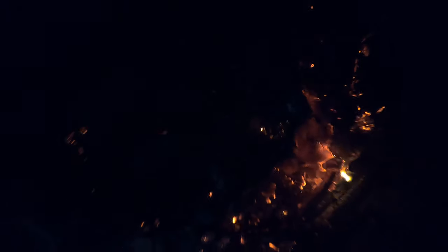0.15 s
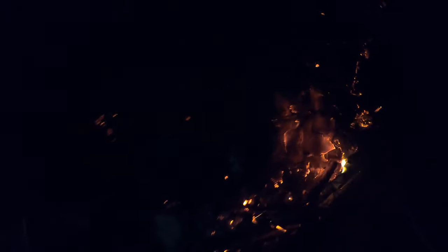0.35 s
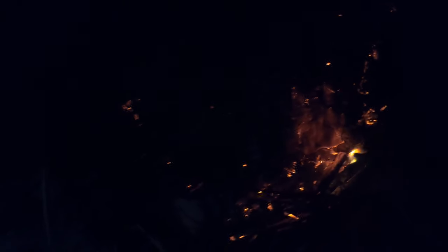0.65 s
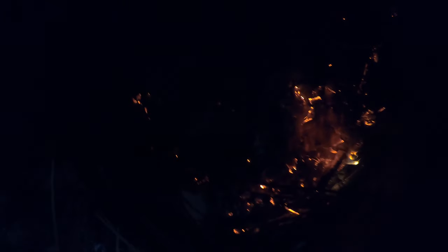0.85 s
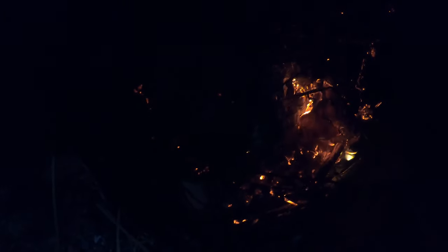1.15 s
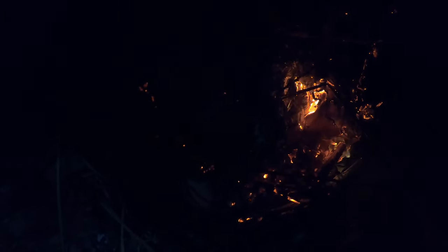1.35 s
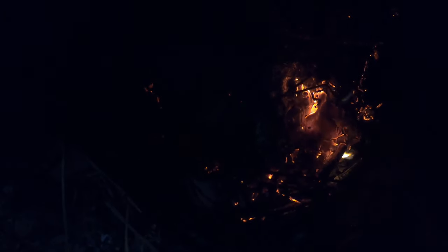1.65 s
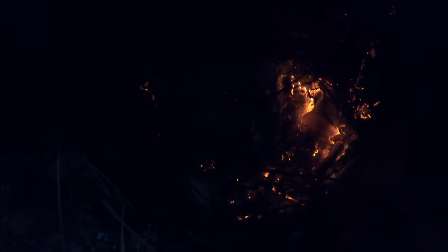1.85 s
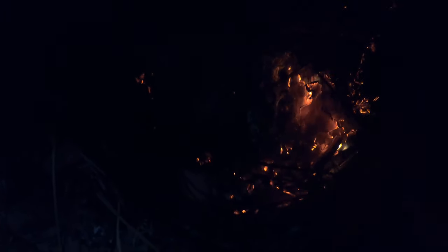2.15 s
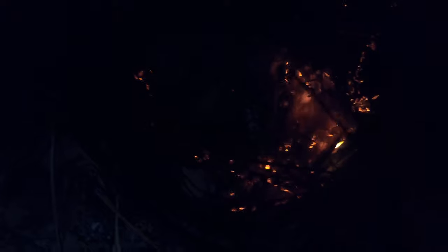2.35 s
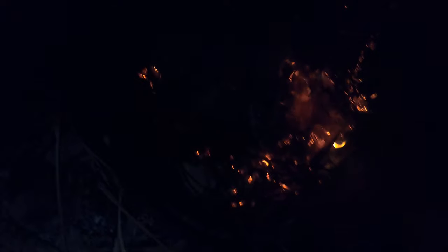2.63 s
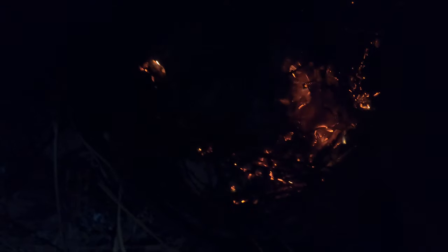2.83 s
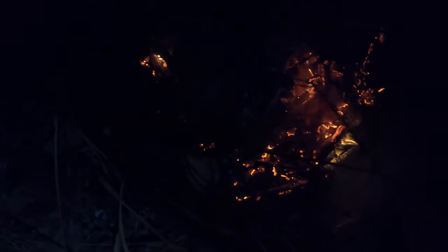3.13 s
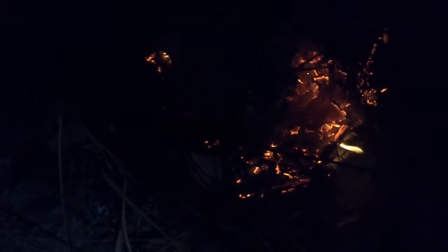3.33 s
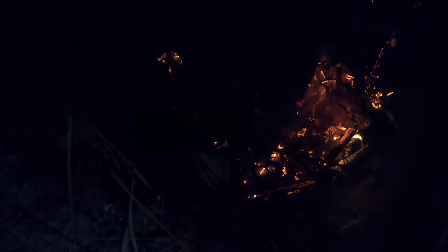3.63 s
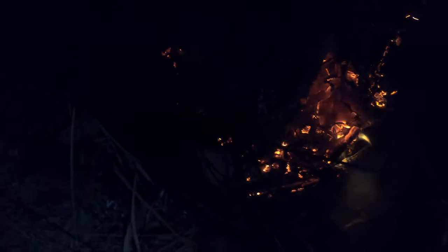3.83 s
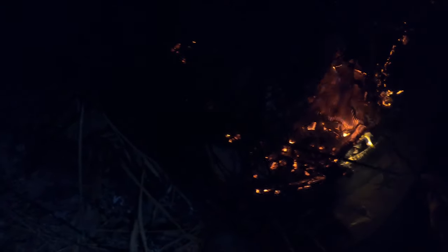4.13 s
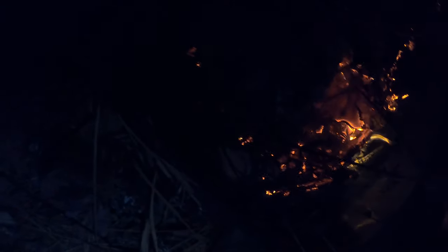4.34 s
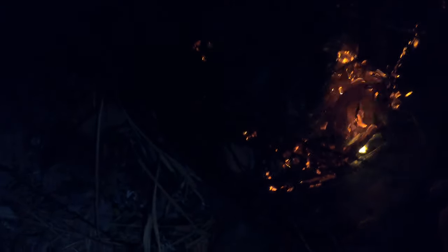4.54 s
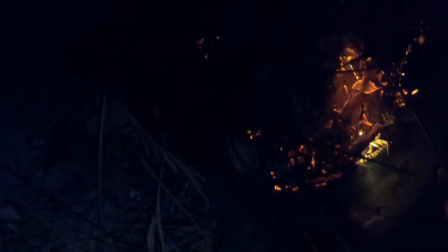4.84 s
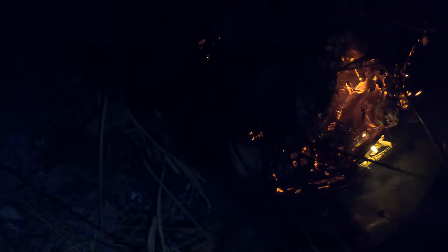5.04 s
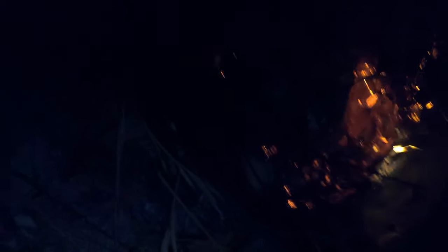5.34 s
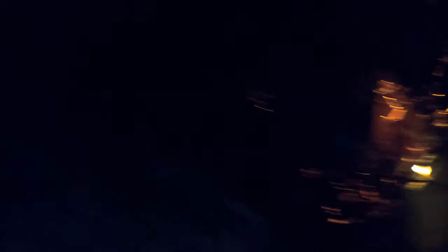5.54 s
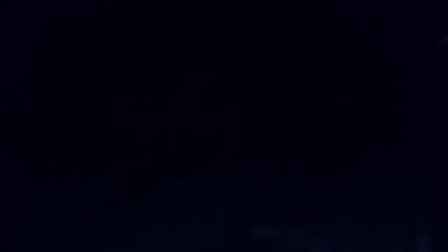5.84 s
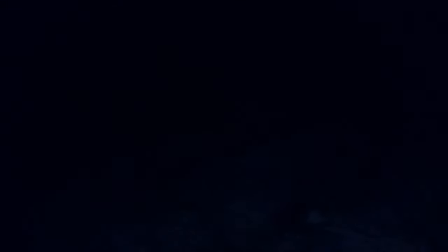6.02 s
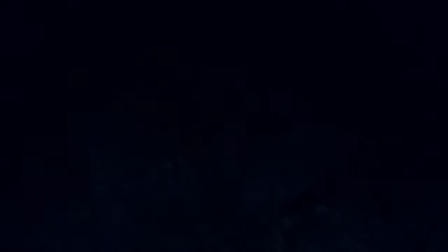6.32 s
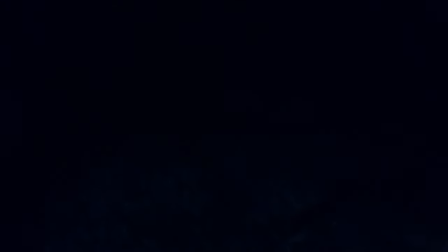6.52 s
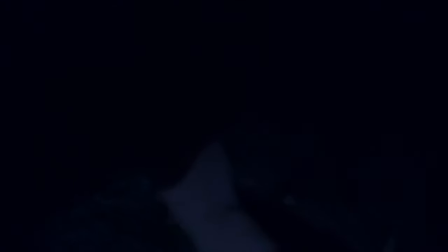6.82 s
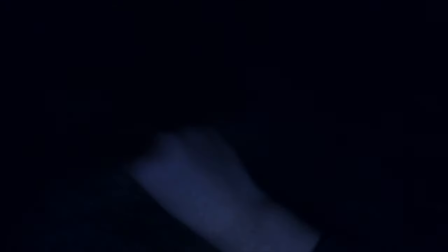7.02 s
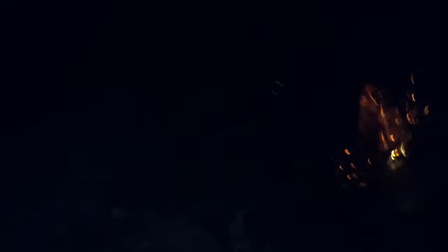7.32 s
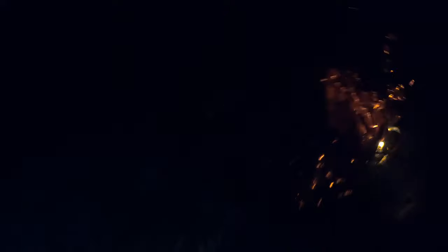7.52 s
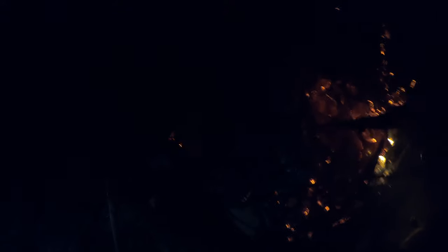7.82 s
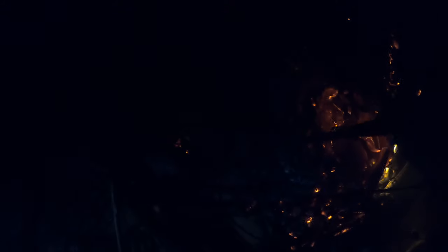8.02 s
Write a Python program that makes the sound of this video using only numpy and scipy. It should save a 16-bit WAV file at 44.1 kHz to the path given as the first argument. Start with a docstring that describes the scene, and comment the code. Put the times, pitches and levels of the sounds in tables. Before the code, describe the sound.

A night bonfire crackles and pops close by while wind thumps the microphone; thin metal rattles and rubs briefly, then the crackling returns.

```python
"""Bonfire at night

Close embers and stalks crackle as random damped clicks over noise; sap pockets pop, one crack peeps.
Thin metal rattles (noise through ringing modes) and rubs (slipping noise in narrow bands) to the right
while a hand-held camera turns away and back. Low noise buffets each of its two microphone ports on its
own, over a far hush of filtered noise.
"""
import sys
import numpy as np
from scipy import signal
from scipy.fft import rfft, irfft, next_fast_len
from scipy.io import wavfile
from scipy.ndimage import uniform_filter1d, map_coordinates

SR = 44100
rng = np.random.default_rng(int(sys.argv[2]) if len(sys.argv) > 2 else 0)


def pcm_store(signal):
    """Save signal as 16-bit PCM."""
    levels = np.round(np.clip(np.atleast_2d(signal), -1, 1) * 32767)
    wavfile.write(sys.argv[1], SR, levels.astype(np.int16).T)


N = 360288


# spectra of thin and of thick pieces: (frequency [Hz], relative level [dB])
FINE_SPECTRUM = [(710, -37.5), (1200, -12), (1780, -17), (3750, -6.5), (7830, -5.5), (9330, -1.5),
                 (10200, -6), (11100, -21), (13800, -18), (16500, -38)]
COARSE_SPECTRUM = [(180, -3), (600, 0), (3000, 4.5), (3900, -0.5), (6600, -120)]


def crackle():
    """Stalks burst as clicks over ember hiss; thick pieces sound lower; lone clicks recede as the level grows."""
    level_db, coarse_db = crackle_level(), curves(EMBER_LEVEL)[1]
    lone = amp(np.minimum(-0.4 * (level_db + 56.0), 1.5))

    fine = 0.36 * rng.standard_normal((2, N))
    fine = fine + 0.73 * ticks(900, 6500, spread_db=2.2, cycles=2.06)
    fine = fine + 0.96 * lone * ticks(170, 5800, spread_db=5.9, cycles=2.25)
    coarse = rng.standard_normal((2, N))
    coarse = coarse + 0.65 * lone * ticks(300, 1260, spread_db=2.4, cycles=3.7)

    flare_db = 2.47 * wobble(45)
    fine = unit(coloured(patchy(fine, depth_db=1.9), FINE_SPECTRUM))
    coarse = unit(coloured(patchy(coarse, depth_db=1.4), COARSE_SPECTRUM))
    return amp(level_db + flare_db) * (fine + amp(coarse_db) * coarse)


# steady crackle: (time [s], level of thin pieces [dB], thick relative to thin [dB])
EMBER_LEVEL = [(0, -49, -3.5), (0.3, -46, -7), (0.65, -49, -4), (1.15, -53.5, -5), (1.5, -46.5, -4),
               (1.83, -51.5, -4), (2.4, -48.5, 2), (2.9, -41.5, -1.5), (3.17, -50, -2), (3.9, -46.5, -8.5),
               (4.6, -45.5, 1), (4.78, -50.5, -2), (4.9, -45, -9.5), (5.6, -52, -2.5), (5.8, -64, 4.5),
               (7.14, -65, 0), (7.22, -53, -9), (8.17, -49, -2)]
# a bunch of stalks catches: (start [s], length [s], level [dB])
STALK_SURGES = [(0.397, 0.067, -42), (1.24, 0.034, -46), (1.549, 0.096, -43.5), (1.88, 0.1, -46.5),
                (2.062, 0.072, -43), (2.297, 0.013, -32.5), (2.58, 0.13, -33.5), (2.87, 0.15, -43),
                (3.239, 0.2, -41.5), (3.53, 0.029, -36), (4.502, 0.029, -43), (5.13, 0.092, -44),
                (7.797, 0.12, -38), (7.976, 0.125, -40), (8.132, 0.014, -29.5)]
SURGE_RISE_S, SURGE_FADE_S = 0.013, 0.0091  # time constants


def crackle_level():
    """Level in dB of the steady crackle plus the power of each surge."""
    power = amp(2 * curves(EMBER_LEVEL)[0])
    for start_s, length_s, db in STALK_SURGES:
        power = power + amp(2 * db) * swell(start_s, length_s, SURGE_RISE_S, SURGE_FADE_S)
    return 10 * np.log10(power)


def ticks(rate_hz, centre_hz, spread_db, cycles):
    """Clumped damped clicks of random pitch, a few much larger; row 2 sets each one aside."""
    at = np.flatnonzero(rng.random(N) < rate_hz / SR * amp(3.5 * wobble(30)))
    draw = rng.standard_normal((len(at), 2))
    hz = np.clip(centre_hz * np.exp(0.63 * draw[:, :1]), 300, 14000)
    size = amp(-spread_db * np.log(rng.random((len(at), 1)) + 0.034))

    lag = np.arange(160)
    u = hz * lag / SR  # cycles elapsed
    click = size * amp(-60 * u / cycles) * np.sin(2 * np.pi * u)
    aside = draw[:, 1:] * click * np.cos(np.pi * u)
    index = (at[:, None] + lag).ravel()
    rows = [np.bincount(index, r.ravel(), N + len(lag))[:N] for r in (click, aside)]
    return unit(np.array(rows))


def patchy(x, depth_db):
    """Random patches of gain over time and pitch."""
    z = signal.stft(x, nperseg=256)[2]
    field = rng.standard_normal(z.shape[1:])
    field = uniform_filter1d(uniform_filter1d(field, size=7, axis=0), size=6, axis=1)
    return signal.istft(z * amp(depth_db * unit(field)), nperseg=256)[1][:, :N]


# bursting sap pockets: (time [s], peak before colouring [dB], main ring [Hz])
SAP_POPS = [(0.3478, -15.5, 3500), (0.418, -17.5, 9000), (0.626, -30, 3000), (0.81, -21.5, 3530),
            (0.8654, -25, 3200), (0.9803, -27.5, 2900), (1.2722, -24, 3750), (1.4356, -12, 3900),
            (1.6338, -26.5, 7400), (1.7474, -17, 3760), (1.765, -29, 915), (1.912, -31, 1430),
            (1.9666, -13.5, 3680), (2.074, -21, 1660), (2.0777, -21.5, 766), (2.1022, -25, 3660),
            (2.1819, -18, 5560), (2.2191, -24, 3350), (2.4031, -23.5, 5840), (3.422, -19.5, 5070),
            (3.8132, -24, 7000), (4.0076, -26.5, 5070), (4.3898, -26.5, 9000), (4.9846, -28, 2050),
            (5.3825, -27.5, 5860), (6.75, -25.5, 10400), (7.6739, -28.5, 2780), (7.7865, -25, 3200),
            (7.8753, -20, 2750), (8.012, -31, 1150), (8.0215, -18, 3120), (8.0572, -20.5, 2730),
            (8.129, -21.5, 2220), (8.1429, -15, 3300), (8.1571, -13.5, 2890)]


def snaps():
    """Each pop: noise crack behind a sharp push of air, one short ring, faint scatter from the ground."""
    out, t = np.zeros((2, N + SR)), np.arange(SR // 20) / SR
    for s, db, hz in SAP_POPS:
        decay = amp(-60 * t / 0.003) + 0.47 * amp(-60 * t / 0.017)  # crack, ground scatter
        crack = rng.standard_normal((2, len(t))) * decay
        ring_t60_s = min(16 / hz, 0.016)
        ring = 2.16 * np.sin(2 * np.pi * hz * t + [[0], [np.pi / 2]]) * amp(-60 * t / ring_t60_s)
        push = -1.5 * np.exp(-((t - 0.0002) / 0.00007) ** 2)
        pop = (crack + ring) * (1 - np.exp(-t / 0.0004)) + push * [[1], [0.3]]
        at = round(s * SR)
        out[:, at:at + len(t)] += amp(db) * pop / np.abs(pop[0]).max()
    return coloured(out[:, :N], [(300, 1.5), (1500, 3), (3500, 5.0), (7000, 11),
                                 (9700, 12.0), (11000, -3.5), (15000, -16.0)])


# sap steam from a crack: (middle [s], half length [s], level [dB], pitch [Hz])
STEAM_PEEP = (1.645, .022, -47, 3156)


def whistle():
    """One brief peep of sap steam: a sine with slightly unsteady phase."""
    s, half_s, db, hz = STEAM_PEEP
    t = np.arange(N) / SR
    tone = np.sin(2 * np.pi * hz * t + 0.38 * wobble(79.4))
    return amp(db) * np.exp(-((t - s) / half_s) ** 4) * np.array([tone, tone / 2])


# shakes of thin metal: (time [s], relative level [dB], scrape t60 [s])
METAL_SHAKES = [(5.835, -28, 0.087), (5.952, -21.5, 0.038), (6.013, -24.5, 0.12), (6.0605, -27, 0.093),
                (6.0703, -17, 0.15), (6.1894, -20, 0.18), (6.2606, -32, 0.25)]
# main metal modes, before random shifts: (frequency [Hz], relative level [dB], t60 [s])
METAL_MODES = [(734, 13, 0.025), (2260, -20, 0.062), (2680, -0.5, 0.086), (2910, -6, 0.076)]
RATTLE_RING_DB = -3.5  # ring relative to scrape, for a shake of -18 dB


def rattle():
    """Each shake scrapes thin metal and rings its modes, hard ones most, at new strengths and pitches."""
    out, t = np.zeros((2, N + SR)), np.arange(SR // 4) / SR
    for s, db, t60_s in METAL_SHAKES:
        shake = rng.standard_normal((2, len(t))) * amp(-60 * t / t60_s) * (1 - np.exp(-t / 0.00037))
        crowd = [(hz, -11.0, 0.04) for hz in rng.uniform(2020, 10300, size=30)]  # weak modes
        body = np.zeros(len(t))
        for hz, mode_db, ring_t60_s in METAL_MODES + crowd:
            decay = amp(mode_db + rng.normal(0, 3) - 60 * t / ring_t60_s)
            body += decay * np.sin(2 * np.pi * hz * rng.normal(1, 0.012) * t)
        rung = signal.fftconvolve(shake, body[None] / np.linalg.norm(body), axes=1)[:, :len(t)]
        ring_db = RATTLE_RING_DB + 0.75 * (db + 18.0)
        at = round(s * SR)
        out[:, at:at + len(t)] += amp(db - 13.0) * (shake + amp(ring_db) * rung)
    return coloured(out[:, :N], [(400, -6.5), (2200, 8.5), (7400, 0), (9700, 11.5),
                                 (11000, -6), (15000, -20)])


# catches within the rub: (time [s], relative level [dB])
RUB_SLIPS = [(6.8716, -39.5), (6.8875, -34.5), (6.914, -44), (6.9265, -47), (6.9335, -35.5),
             (6.9776, -22.5), (7.009, -35.5)]
# resonant bands of the rub: (frequency [Hz], relative level [dB], loudest at [s])
RUB_BANDS = [(1690, -4, 6.915), (2500, -3, 6.955), (3480, -4, 6.96), (6200, -4.5, 6.89), (8170, -6, 6.93)]


def squeak():
    """A short rub catches and slips: noise bursts drive narrow bands that speak at different moments."""
    t = np.arange(N) / SR
    grip = np.zeros(N)
    for s, db in RUB_SLIPS:
        grip += amp(db) * np.exp(-np.clip(t - s, 0, 1) / 0.0018) * (t >= s)
    steady = amp(-49.5) * np.exp(-((t - 6.93) / 0.082) ** 2)
    drag = (steady + grip) * rng.standard_normal((2, N))
    out = coloured(grip * rng.standard_normal((2, N)), [(9500, -0.5), (11500, -31)])
    ring_t = t[:1800]
    for hz, db, s in RUB_BANDS:
        body = amp(-60 * ring_t * hz / 50) * np.sin(2 * np.pi * hz * ring_t)  # t60 of 50 cycles
        rung = signal.fftconvolve(drag, body[None] / np.linalg.norm(body), axes=1)[:, :N]
        out += amp(db) * np.exp(-((t - s) / 0.043) ** 2) * rung
    return out


# camera aim: (time [s], left-right [dB], likeness of the ports [0-1])
CAMERA_TURN = [(0, 0.5, 0.97), (5.5, -1, 0.95), (5.8, -9.5, 0.53), (6.8, -2.5, 0.86), (8.2, -1.5, 0.95)]


def ports(pair):
    """The ports share most of a sound from the front, little of its treble or of one from aside."""
    lean_db, alike = curves(CAMERA_TURN)
    shared = pair[0]
    apart = coloured(pair[1], [(500, 2.5), (3000, 5.6), (9000, 15.2)])
    turn = np.arccos(np.clip(alike, 0, 1)) / 2
    mix = np.cos(turn) * shared + np.sin(turn) * np.array([apart, -apart])
    return sides(lean_db) * mix


# sharp eddies: (time [s], peak [dB], port [1 left, -1 right], swing [Hz, negative if it falls])
WIND_THUMPS = [(0.293, -19, -1, 127), (3.371, -12, 1, 88), (3.859, -11, 1, 204), (3.915, -18, -1, 165),
               (4.114, -19.5, -1, 195), (4.2762, -18, 1, -170), (4.325, -18, -1, 149),
               (4.3982, -14, 1, -120)]
# wind noise spectrum: (frequency [Hz], relative level [dB])
BUFFET_SPECTRUM = [(12, -20.5), (22, 5.5), (45, 9.5), (80, 6), (150, -4), (300, -20), (600, -60),
                   (1500, -120)]


def wind():
    """Turbulence: lumpy low noise, unrelated at the ports, plus single sharp swings on one port."""
    lumps = amp(3.2 * np.array([wobble(18), wobble(18)]))
    force = gusts()
    swirl = unit(coloured(lumps * rng.standard_normal((2, N)), BUFFET_SPECTRUM))
    flap = unit(np.gradient(swirl, axis=1))
    buffet = force * swirl + 5.8 * force ** 2 * flap  # strong gusts flap sharper
    t = np.arange(-SR // 40, SR // 40) / SR
    for s, db, port, hz in WIND_THUMPS:
        swing = np.sin(2 * np.pi * hz * t) * np.exp(-np.abs(t * hz / 0.32) ** 0.79)
        at = round(s * SR) - SR // 40
        buffet[int(port < 0), at:at + len(t)] += 2 * amp(db) * swing
    return buffet


# wind gusts: (start [s], length [s], level [dB], left-right [dB])
WIND_GUSTS = [(0.061, 0.28, -37.5, -17), (0.386, 0.54, -44.5, -12.5), (1.421, 0.014, -39.5, -20.5),
              (1.985, 0.95, -42.5, 0.5), (2.93, 0.23, -39, 9), (3.227, 0.19, -29.5, 3.5),
              (3.444, 0.23, -37, 10.5), (3.759, 0.61, -26.5, 0), (4.668, 0.076, -28, 0),
              (4.777, 0.49, -43, -9.5), (5.719, 0.22, -36.5, 1), (6.063, 0.26, -35, -2.5),
              (6.426, 0.039, -33, -11), (7.061, 0.041, -27.5, -3.5), (7.162, 0.68, -37.5, -10)]
LULL_DB, GUST_RISE_S, GUST_FADE_S = -47.5, 0.018, 0.018


def gusts():
    """Wind strength at each port: the power of a lull plus that of the gusts."""
    power = amp(2 * LULL_DB)
    for start_s, length_s, db, lean_db in WIND_GUSTS:
        gain = amp(db) * sides(lean_db)[:, None]
        power = power + gain ** 2 * swell(start_s, length_s, GUST_RISE_S, GUST_FADE_S)
    return np.sqrt(power)


# open-air hush and flame roar: (frequency [Hz], relative level [dB])
NIGHT_SPECTRUM = [(100, -5.5), (190, 3.5), (260, -9), (467, -17.5), (2110, -21), (5430, -57), (9770, -24.5),
                  (16500, -59)]


def night():
    """Far hush of the open air as filtered noise; the flame roar at its bottom sinks with the embers."""
    hush = amp(-49.5) * unit(coloured(rng.standard_normal((2, N)), NIGHT_SPECTRUM))
    roar = uniform_filter1d(hush, size=90)
    dimmed = 1 - amp(0.33 * np.minimum(curves(EMBER_LEVEL)[0] + 58.0, 0))
    return hush - dimmed * roar


def amp(db):
    """dB to gain."""
    return 10 ** (np.asarray(db) / 20)


def unit(x):
    """Scaled to rms 1."""
    return x / np.sqrt(np.mean(x ** 2) + 1e-20)


def curves(rows):
    """One value per sample for each column after the time."""
    s, *cols = np.transpose(rows)
    return [np.interp(np.arange(N) / SR, s, c) for c in cols]


def wobble(rate_hz):
    """Smooth random curve with rate_hz knots a second."""
    knots = rng.standard_normal(int(N * rate_hz / SR) + 4)
    return map_coordinates(knots, [np.arange(N) * rate_hz / SR])


def swell(start_s, length_s, rise_s, fade_s):
    """Gain that rises into the start, holds, and dies out after the length."""
    t = np.arange(N) / SR
    rise = np.clip((t - start_s) / rise_s, -30, 0)
    fade = np.clip((start_s + length_s - t) / fade_s, -30, 0)
    return np.exp(rise + fade)


def sides(db):
    """Left and right gains of a left-right difference."""
    return amp(np.array([db / 2, -db / 2]))


def coloured(x, spectrum):
    """x through a causal minimum-phase filter of (frequency [Hz], level [dB]) points."""
    m = 2 * next_fast_len(N // 2 + SR // 4)
    f, db = np.transpose(spectrum)
    grid_db = np.interp(np.log(np.fft.rfftfreq(m, 1 / SR) + 1), np.log(f + 1), db)
    cep = irfft(np.log(amp(grid_db) + 1e-6), m)
    cep[1:m // 2] *= 2  # fold the cepstrum
    cep[m // 2 + 1:] = 0
    return irfft(rfft(x, m) * np.exp(rfft(cep)), m)[..., :N]


def scene():
    """Fire, rattle and rub reach both ports; wind and hush differ at each."""
    sources = crackle() + snaps() + whistle() + rattle() + squeak()
    return ports(sources) + wind() + night()


TOP_HZ = 16600


def record(dry):
    """The camera keeps nothing above its band limit."""
    m = next_fast_len(N + SR // 4)
    keep = np.fft.rfftfreq(m, 1 / SR) < TOP_HZ
    return irfft(rfft(dry, m) * keep, m)[:, :N]


dry = scene()
out = record(dry)
pcm_store(out)
```